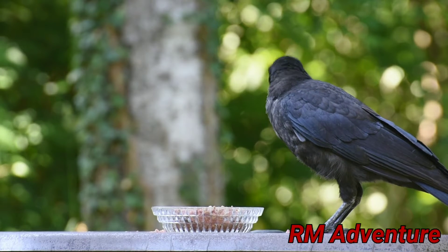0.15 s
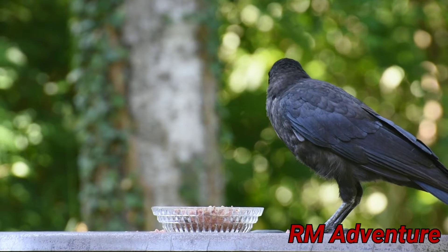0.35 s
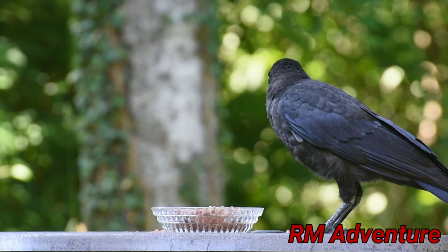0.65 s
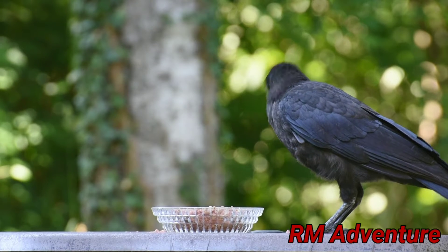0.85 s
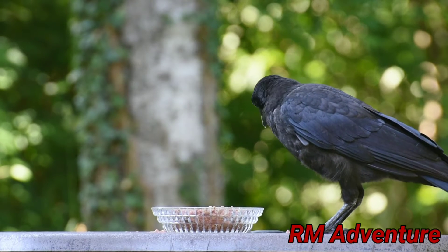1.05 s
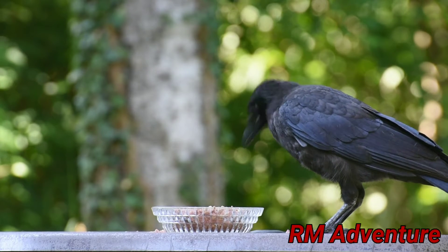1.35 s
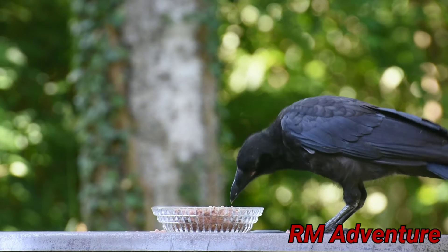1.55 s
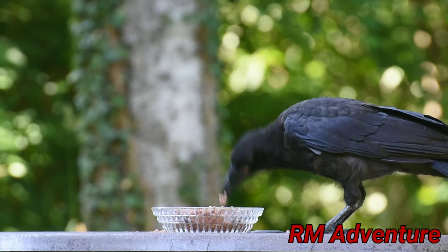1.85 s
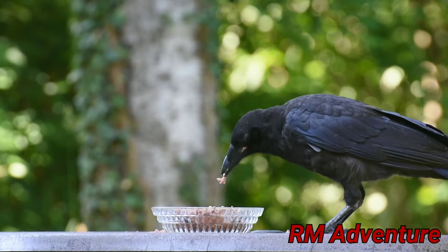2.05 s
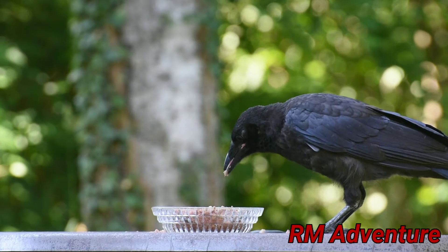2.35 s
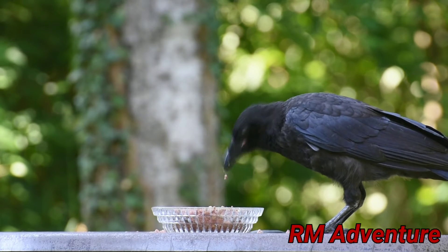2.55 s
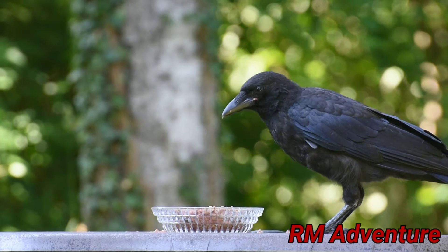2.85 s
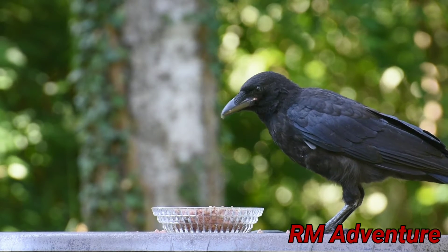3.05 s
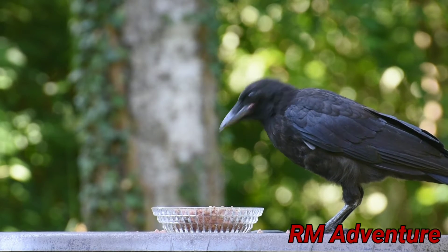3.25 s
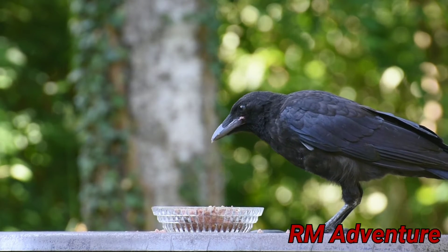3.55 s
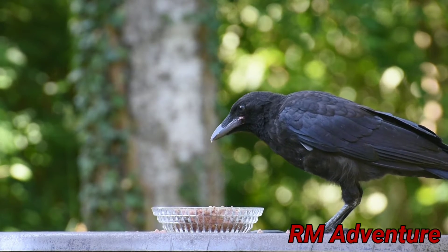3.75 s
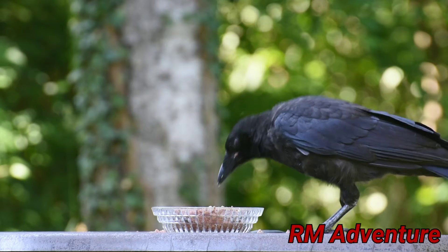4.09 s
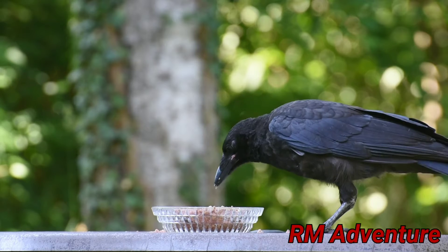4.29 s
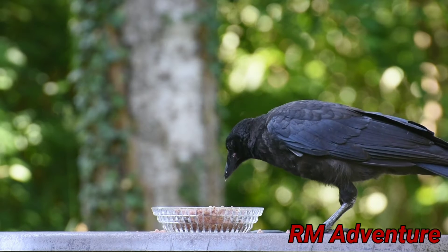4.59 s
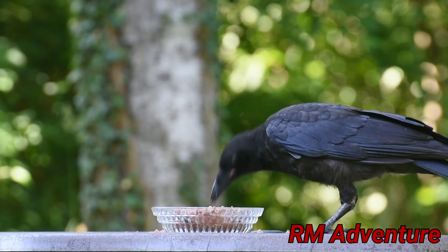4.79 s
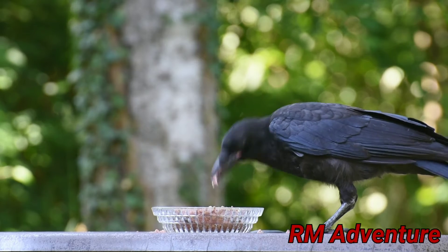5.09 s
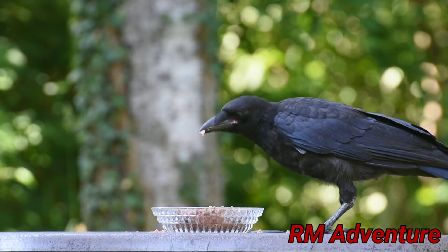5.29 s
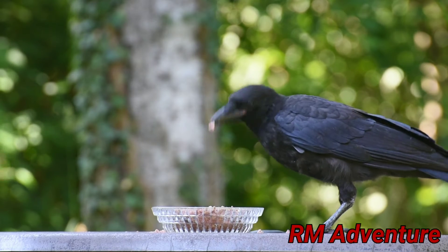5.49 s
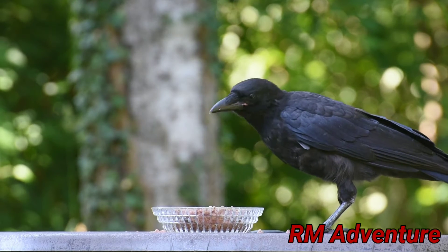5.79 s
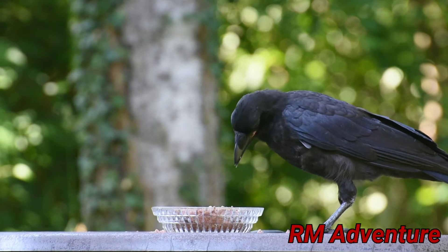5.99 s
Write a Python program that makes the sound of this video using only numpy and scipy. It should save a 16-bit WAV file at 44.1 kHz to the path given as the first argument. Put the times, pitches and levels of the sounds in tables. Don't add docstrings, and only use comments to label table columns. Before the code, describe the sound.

A rasping crow dominates, cawing five times at uneven intervals, each call about a third to half a second long. Before it starts, far crows answer softly and sparrows whistle falling chirps; more small bird sounds and faint croaks follow later. The place is open and leafy, with brief scattered echoes, gentle airy noise, fuzzy insects and distant engines humming steadily. The crow sits slightly right of centre, the sparrows slightly left.

```python
import sys
import numpy as np
from scipy import signal
from scipy.io import wavfile
from scipy.ndimage import uniform_filter1d, map_coordinates

SR = 44100
rng = np.random.default_rng(int(sys.argv[2]) if len(sys.argv) > 2 else 0)


def rack_gain(trim_db):
    fader = np.asarray(trim_db, float)
    return 10 ** (fader / 20)


def file_out(sig):
    cols = np.atleast_2d(sig).T
    lim = np.clip(cols, -1, 1)
    pcm = np.round(lim * 32767).astype(np.int16)
    wavfile.write(sys.argv[1], SR, pcm)


N = 270333

# (frequency [Hz], level per Hz [dB])
FLOOR_SPECTRUM = [(35, -31.5), (50, 9), (110, -4.5), (180, -3.5), (330, -13.5), (800, -13.5), (1700, -17.5),
                  (2650, -17.5), (4600, -17), (7500, -22.5), (9500, -23.5), (11000, -26.5), (15200, -31)]
FLOOR_DB = -65.5
# (frequency [Hz], likeness [-1 to 1])
FLOOR_LIKENESS = [(60, 0.99), (180, 0.58), (540, 0.51), (1630, 0.47), (4910, 0.14), (14800, -0.22)]
# (time [s], breeze in leaves [dB], far engines [dB], tyres on the road [dB])
FLOOR_SWELLS = [(0, 6.5, -1.5, 0), (.4, 2, 4, -3), (.8, 6, 4.5, 1), (1.15, 7, 1, -2.5), (2.3, 6, -0.5, 3),
                (2.65, 2.5, -1, 5.5), (3.0, 4, 0, 4.5), (3.5, 0, 0, .5), (4.4, -1, 0, 1.5),
                (4.85, 5, 0.5, -4.5), (5.65, 0, -.5, 4), (6.13, 1.5, 1, -1)]
# (time [s], level [dB], frequency [Hz])
INSECT_HISS = [(0, -62.5, 7900), (.5, -57.5, 8080), (1.0, -54.5, 8600), (1.9, -59, 8040), (2.55, -59, 8900),
               (3.45, -64, 8770), (4.5, -61.5, 8950), (5.4, -61, 8170), (6.13, -68.5, 8600)]
# (frequency [Hz], level [dB])
ENGINE_TONES = [(52.3, -75), (105, -83), (119, -96.5), (162, -83), (178, -78)]
# (frequency [Hz], time to fall 60 dB [s])
WOODS_DECAY = [(800, 0.45), (2000, 0.31), (5000, 0.46), (10000, 0.3)]
# (time [s], length [s], effort [dB], throat frequency [Hz], throat width [Hz])
FAR_CAWS = [
    (0.033, 0.27, -45.5, 1843, 444),
    (0.237, 0.24, -57.5, 1580, 517),
    (0.412, 0.2, -52, 1820, 407),
    (1.178, 0.32, -43, 1953, 200),
    (4.48, 0.13, -61.5, 1450, 200),
    (4.57, 0.29, -64, 1790, 220),
    (5.429, 0.11, -58.5, 1450, 320),
    (5.76, .14, -61.5, 1520, 220),
    (5.87, .26, -65, 1860, 320),
]
# (time [s], level [dB], frequency [Hz], width [Hz], length [s])
FAR_CROAKS = [
    (5.18, -68, 704, 170, .05),
    (5.59, -68, 672, 220, .11),
    (5.9, -75, 1040, 260, .09),
]
# (time [s], peak [dB], frequency [Hz], length [s])
THIN_WHISTLES = [ (0.574, -69, 2970, 0.1), (0.735, -58, 4600, 0.011), (0.824, -62, 3450, 0.041),
                 (0.854, -56.5, 5150, 0.032), (2.483, -49, 4760, 0.0092), (2.498, -55.5, 5090, 0.017),
                 (2.534, -50, 4350, 0.0048), (2.545, -59, 5520, 0.01), (3.824, -46, 3260, 0.015),
                 (4.24, -67, 4580, 0.064), (4.619, -60.5, 3400, 0.064), (4.776, -67.5, 4560, 0.082),
                 (5.408, -58.5, 4600, 0.028), (5.723, -69, 4560, 0.039), (5.986, -70, 4540, 0.106), ]
# (time [s], peak [dB], start frequency [Hz], length [s], octave [dB])
SPARROW_CHIRPS = [ (0.477, -53, 3310, 0.018, -9), (0.502, -45.5, 3490, 0.022, -13),
                  (0.521, -44, 3217, 0.037, -14), (0.958, -41, 3497, 0.035, -23),
                  (0.981, -49, 3280, 0.035, -6.5), (1.051, -42, 3375, 0.039, -8),
                  (1.095, -56.5, 3400, 0.023, 8), (1.494, -44.5, 3335, 0.045, -42),
                  (1.591, -42, 3300, 0.044, 1), (1.879, -55.5, 3150, 0.028, -16),
                  (1.9, -46, 3215, 0.022, -42), (2.586, -69, 3950, 0.021, -42),
                  (3.178, -61, 2680, 0.035, -44), (3.253, -63.5, 3330, 0.062, -98),
                  (3.833, -45.5, 3030, 0.031, -32), (4.689, -48, 3645, 0.024, -21),
                  (4.719, -50, 3150, 0.008, -13), (4.759, -56.5, 3435, 0.0132, -2.5),
                  (5.485, -49.5, 4400, 0.0198, -21), ]
# (time [s], level [dB], frequency [Hz], width [Hz], length [s])
SPARROW_CHATTER = [ (0.48, -64.5, 5200, 1190, 0.1), (0.633, -55, 4050, 1080, 0.0089),
                   (0.701, -58, 4644, 970, 0.0049), (.797, -63, 3800, 1080, 0.024),
                   (.821, -58, 5850, 1630, .025), (.822, -54.5, 3340, 1700, 0.0061),
                   (2.455, -63, 3105, 506, 0.036), (2.6, -58, 3550, 920, .02),
                   (2.998, -68, 3617, 710, 0.053), (4.55, -79, 4600, 170, 0.071),
                   (4.745, -58.5, 3100, 1500, 0.035), (5.178, -55.5, 5630, 1300, 0.029),
                   (5.199, -60.5, 3630, 950, 0.013), (5.323, -62.5, 4420, 1600, 0.043),
                   (5.356, -54, 4200, 1400, 0.021), (5.489, -53, 3800, 470, 0.0132),
                   (5.528, -59.5, 3380, 1100, 0.022), ]
# (time [s], effort [dB], beak opening [0-1])
CAW_CURVES = [
    [(1.32, -57, 0.21), (1.38, -38, 0.06), (1.418, -32, 0.57), (1.5, -30.5, 0.76), (1.58, -31, .85),
     (1.65, -32.5, 0.85), (1.685, -35, 0.28), (1.74, -55, 0.64)],
    [(2.045, -77, 0.23), (2.1, -38, 0.39), (2.14, -33.5, 0.76), (2.185, -33.5, .95), (2.235, -31.5, 0.89),
     (2.31, -33, 0.66), (2.36, -35, 0.22), (2.4, -57, .6)],
    [(2.7, -65.5, 0.42), (2.766, -37, 0.35), (2.8, -35, 0.73), (2.88, -32.5, 0.93), (2.96, -33.5, 0.99),
     (3.05, -34, 0.82), (3.085, -38.5, 0.44), (3.14, -73, 0.7)],
    [(3.71, -79, .1), (3.786, -40, 0.32), (3.835, -32, 0.54), (3.99, -32, 0.98), (4.08, -32.5, 0.87),
     (4.14, -33.5, .6), (4.178, -38, 0.31), (4.24, -59, 0.99)],
    [(4.82, -79, 0.01), (4.89, -44.5, 0.075), (4.932, -34.5, 0.22), (5.0, -33, 0.88), (5.06, -31, 0.92),
     (5.105, -34, 0.96), (5.146, -37.5, 0.43), (5.2, -61, 0.5)],
]
# (flutter [Hz], flutter glide [Hz/s], throat [Hz], rasp [dB], beak [dB])
CAW_VOICES = [(72.64, 4, 1863, -11.5, -13), (76.8, 2, 1815, -7.5, -5), (77.6, -12, 1856, -4.5, -0.5),
              (75.8, 5.5, 1844, -9, -3), (74.7, 14.5, 1796, -9, -7)]
# (frequency [Hz], width [Hz], level [dB])
CHEST_RINGS = [(1275, 263, -21.5), (1450, 162, -10)]
# (frequency [Hz], width [Hz], level [dB])
BEAK_RINGS = [(2183, 307, -1.5), (2481, 250, -21), (2646, 650, -27.5)]
# (frequency [Hz], width [Hz], level [dB])
RASP_RINGS = [(5076, 990, 4), (5930, 880, 1.5)]
# (frequency [Hz], width [Hz], level [dB])
TOP_RINGS = [
    [(7070, 860, 1), (8600, 1540, 0.5), (10690, 620, -3.5), (12600, 1500, -56)],
    [(7360, 1400, 2), (8800, 620, 4.5), (10600, 860, -7), (12100, 300, -14)],
    [(7110, 690, 7), (8600, 2300, -5), (10750, 570, 0.5), (11700, 400, -54)],
    [(6840, 2200, 0.5), (9000, 650, 5.5), (10170, 240, -6.5), (13400, 1700, -4.5)],
    [(7070, 1200, 0.5), (8740, 770, 6), (10500, 370, -15), (13600, 2100, -6)],
]


def evened(x):
    return x / np.sqrt(np.mean(x ** 2) + 1e-20)


def read(points, hz):
    f, value = np.transpose(points)
    return np.interp(np.log(hz + 1), np.log(f + 1), value)


def columns(rows, t):
    s, *values = np.transpose(rows)
    return [np.interp(t, s, v) for v in values]


def add(mix, s, sound):
    part = mix[round(s * SR):][:len(sound)]
    part += sound[:len(part)]


def drift(count, rate_hz):
    size = int(np.clip(SR / rate_hz, 2, count))
    smooth = uniform_filter1d(rng.standard_normal(count), size)
    return evened(uniform_filter1d(smooth, size))


def above(x, hz):
    return signal.sosfilt(signal.butter(4, hz, "high", fs=SR, output="sos"), x)


def resonate(x, hz, width, order=2):
    turn = np.exp(2j * np.pi * np.cumsum(hz * np.ones(len(x))) / SR)
    r = np.exp(-np.pi * abs(width) / SR)
    low = x / turn
    for _ in range(order):
        low = signal.lfilter([1 - r], [1, -r], low)
    return 2 * (turn * low).real


def tract(drive, rings, shift, order=3):
    total = 0
    for k, (hz, width, db) in enumerate(rings):
        total = total + (-1) ** k * rack_gain(db) * resonate(drive, hz * shift, width, order=order)
    return total


def steadied(x):
    power = uniform_filter1d(evened(x) ** 2, int(0.06 * SR))
    return evened(x / np.sqrt(power + 0.024))


def woods(x, first_s, reach=1):
    taps = np.zeros((2, SR))
    at = np.arange(0, SR - 20, 20) + rng.integers(0, 20, (2, (SR - 1) // 20))
    np.put_along_axis(taps, at, rng.choice([-1., 1.], at.shape), 1)
    taps = taps * np.clip(np.arange(SR) / SR / first_s - 1, 0, 1)
    hz, t, z = signal.stft(taps, SR, nperseg=256)
    decay_db = -60 * t / reach / read(WOODS_DECAY, hz)[:, None]
    tail = signal.istft(z * rack_gain(decay_db), SR, nperseg=256)[1]
    return signal.fftconvolve(x[None], tail / np.linalg.norm(tail[0]), axes=1)[:, :N]


def engine_hum():
    t = np.arange(N) / SR
    total = np.zeros(N)
    for hz, db in ENGINE_TONES:
        strength = rack_gain(db + 1.9 * drift(N, 3.9))
        total += strength * np.sin(2 * np.pi * hz * t + 0.53 * drift(N, 1.6))
    return total


def leaves_and_traffic():
    frames, hz = N // 256 + 5, np.fft.rfftfreq(1024, 1 / SR)
    a, b, c, d, patches = rng.standard_normal((frames, 513, 5)).T
    patches = evened(uniform_filter1d(uniform_filter1d(patches, 10, 0), 16, 1))
    breeze_db, engines_db, tyres_db = columns(FLOOR_SWELLS, np.arange(frames) * 256 / SR)
    same = np.clip(read(FLOOR_LIKENESS, hz), -1, 1)[:, None]
    left = a + 1j * b
    z = np.array([left, same * left + np.sqrt(1 - same ** 2) * (c + 1j * d)])
    z *= rack_gain(read(FLOOR_SPECTRUM, hz)[:, None] + 2.0 * patches)
    heard = signal.istft(z * (hz > 250)[:, None], nperseg=1024, noverlap=768)[1]
    scale = rack_gain(FLOOR_DB) / np.sqrt(np.mean(heard ** 2))
    leafy = np.clip(np.log2(hz / 900 + 1e-9), 0, 1)[:, None]
    heavy = np.clip(np.log2(400 / (hz + 1)), 0, 1)[:, None]
    z *= rack_gain(leafy * breeze_db + heavy * engines_db + (1 - heavy - leafy) * tyres_db)
    return scale * signal.istft(z, nperseg=1024, noverlap=768)[1][:, :N]


def insects():
    db, hz = columns(INSECT_HISS, np.arange(N) / SR)
    sides = []
    for noise in rng.standard_normal((2, N)):
        sides.append(rack_gain(db - 8 + 2.0 * drift(N, 15)) * evened(resonate(noise, hz, 1200)))
    return np.array(sides)


def syrinx(flutter_hz, jitter, memory, breath, gate, mirror):
    turns = np.cumsum(flutter_hz * (1 + jitter * drift(len(flutter_hz), 60))) / SR
    slaps = rng.standard_normal((90, 600))
    slaps = signal.lfilter([1], [1, -memory], slaps, axis=0)[20:]
    slaps = evened(slaps - mirror * np.roll(slaps, 300, axis=1))
    train = map_coordinates(slaps, [turns, turns % 1 * 599], order=1, mode="nearest")
    puffs = gate + np.exp(-(2 * turns % 1) / 0.3)
    return evened((train + breath * rng.standard_normal(len(turns))) * puffs)


def far_caw(s, length, db, hz, width):
    rise_s, release_s = 0.032, 0.3
    t = np.arange(0, length, 1 / SR)
    throat_hz = hz * (1 - 0.021 * t / length)
    drive = syrinx(80 + 0 * t, jitter=.006, memory=.75, breath=.35, gate=2.0, mirror=0)
    voice = evened(resonate(drive, throat_hz, width))
    voice = voice + rack_gain(-15.5) * evened(resonate(drive, throat_hz / 2, 88))
    voice = voice + rack_gain(-20) * evened(resonate(drive, 4080, 320))
    voice = voice - rack_gain(-13) * (width / 450) ** 2 * evened(resonate(drive, 0.73 * throat_hz, width))
    shape = np.minimum(t / rise_s, 1) ** 2 * rack_gain(0.5 * (t / length) ** 2)
    shape = shape * np.sqrt(np.clip((length - t) / release_s, 0, 1))
    return s, rack_gain(db) * shape * voice


def chirp(s, db, start_hz, end_hz, length, overtone_db):
    u = np.linspace(0, 1, int(max(length, .004) * SR))
    burr = drift(SR // 5, 720)[:len(u)]
    hz = (start_hz + (end_hz - start_hz) * u) * (1 + 0.029 * burr)
    turn = 2 * np.pi * np.cumsum(hz) / SR
    tone = np.sin(turn) + rack_gain(overtone_db) * np.sin(2 * turn)
    return s, rack_gain(db + 2.7 * burr) * tone * np.sin(np.pi * u ** 1.3)


def chatter(s, db, hz, width, length):
    burst = evened(resonate(rng.standard_normal(4000), hz, width, order=3))[:int(length * SR)]
    return s, rack_gain(db) * burst * np.sin(np.linspace(0, np.pi, len(burst)))


def caw(rows, voice, top):
    flutter, glide, throat, rasp, beak_wide_db = voice
    t = np.arange(rows[0][0], rows[-1][0], 1 / SR)
    effort_db, opening = columns(rows, t)
    below_peak_db = effort_db - effort_db.max()

    shut = 1 - np.clip(opening, 0, 1)
    throat_hz = throat * (1 - 0.12 * shut)
    rasp_db = rasp - 8.5 * shut ** 2.16
    beak_db = beak_wide_db - 14 * shut
    flutter_hz = flutter + glide * (t - t[0])
    flutter_hz = flutter_hz * (1 - 0.09 * shut + 0.01 * drift(len(t), 13.65))
    drive = syrinx(flutter_hz, jitter=.004, memory=.8, breath=.36, gate=2.2, mirror=.45)
    hoarse = drive + 1.6 * rng.standard_normal(len(t))

    stretch = (throat_hz / 1820) ** 0.46
    push = rack_gain(1.9 * below_peak_db)
    throat_ring = resonate(drive, throat_hz, 434, order=4)
    low = steadied(above(throat_ring + push * tract(drive, CHEST_RINGS, stretch), 930))
    low = low + rack_gain(-33.5) * evened(resonate(hoarse, 908, 223, order=3))
    beak = rack_gain(beak_db - 3.0) * steadied(tract(drive, BEAK_RINGS, stretch))

    upper = tract(hoarse, RASP_RINGS, 0.93, order=2)
    upper = upper + rack_gain(0.5 * below_peak_db) * tract(hoarse, top, 0.964, order=2)
    bridge = rack_gain(-11.5) * resonate(hoarse, 3566, 590, order=4)
    high = rack_gain(rasp_db) * evened(above(upper, 3800) + bridge)
    high = high * (1 + 0.22 * np.cos(2 * np.pi * np.cumsum(flutter_hz) / SR))
    return t[0], rack_gain(effort_db) * (low - beak + high) * signal.windows.tukey(len(t), .22)


def scene():
    crow, others, birds = np.zeros((3, N))
    for row in FAR_CAWS:
        add(others, *far_caw(*row))
    for s, db, hz, length in THIN_WHISTLES:
        add(birds, *chirp(s, db, hz, hz * 1.019, length, -21))
    for s, db, hz, length, octave_db in SPARROW_CHIRPS:
        add(birds, *chirp(s, db, hz, hz * 0.86, length, octave_db))
    for row in SPARROW_CHATTER + FAR_CROAKS:
        add(birds, *chatter(*row))
    for rows, voice, top in zip(CAW_CURVES, CAW_VOICES, TOP_RINGS):
        add(crow, *caw(rows, voice, top))

    far = others * rack_gain([[-5.5], [-7.5]]) + rack_gain(-10.5) * woods(others, 0.0041)
    background = far + rack_gain(-1.5) * (leaves_and_traffic() + insects()) + engine_hum()
    lag = 768
    background[:, lag:] += 0.54 * background[:, :-lag].copy()
    song = birds * rack_gain([[1.2], [-.8]]) + rack_gain(-1) * woods(birds, 0.00063)
    twigs = rack_gain(-6.5) * woods(above(crow, 3560), 0.0024, reach=0.23)
    near = (crow + twigs + rack_gain(-14.5) * woods(crow, 0.011)) * rack_gain([[-1.6], [1.2]])
    return near + song + background


def sink_treble(x):
    top = signal.sosfiltfilt(signal.butter(12, 11150, "high", fs=SR, output="sos"), x)
    level_db = 10 * np.log10(abs(uniform_filter1d((x ** 2).mean(0), 2048)) + 1e-12)
    loudness = np.clip((level_db + 44) / 4, 0, 1)
    return x - top * (1 - rack_gain(-22 * loudness))


def top_cut(x):
    return signal.sosfilt(signal.butter(12, 15350, fs=SR, output="sos"), x)


def record(dry):
    mix = sink_treble(dry)
    return top_cut(mix)


dry = scene()
out = record(dry)
file_out(out)
```